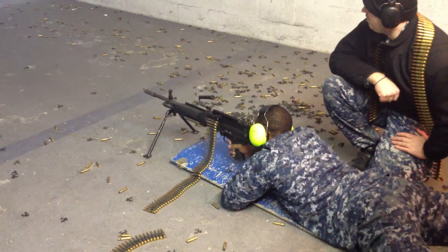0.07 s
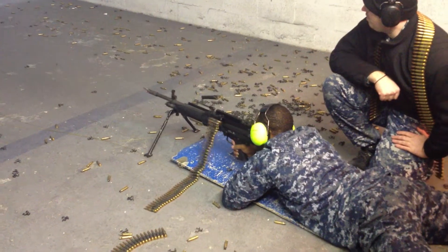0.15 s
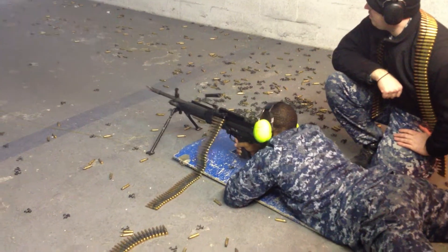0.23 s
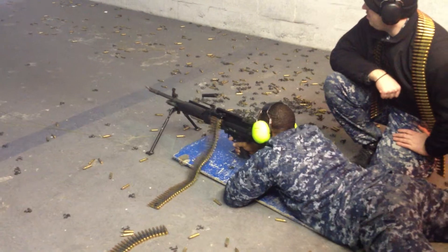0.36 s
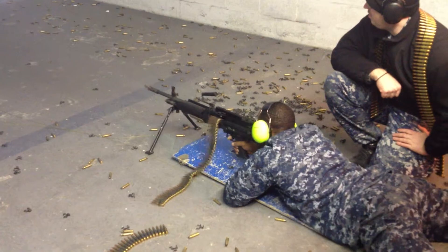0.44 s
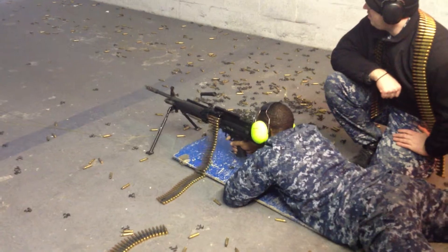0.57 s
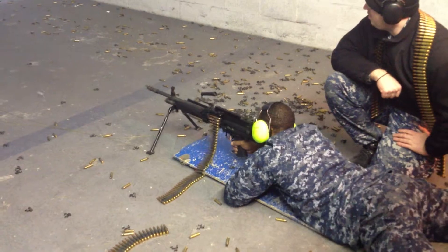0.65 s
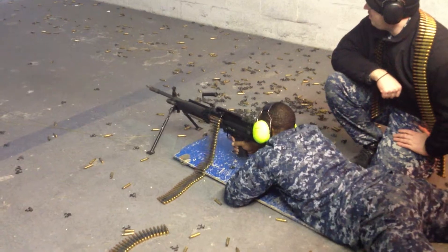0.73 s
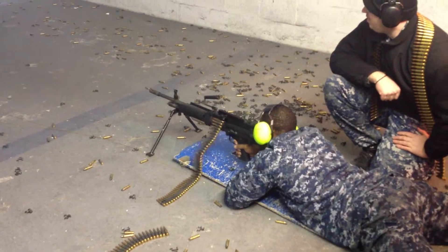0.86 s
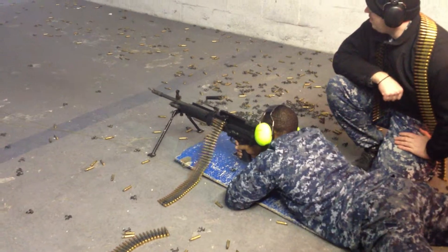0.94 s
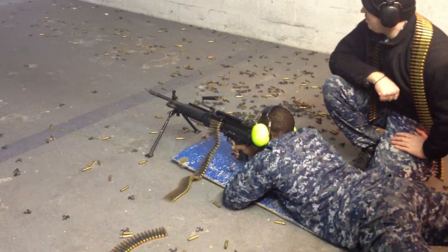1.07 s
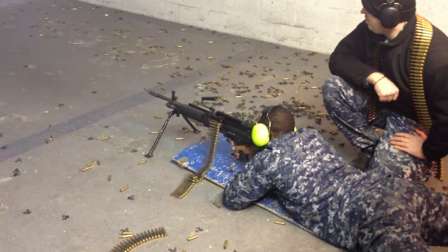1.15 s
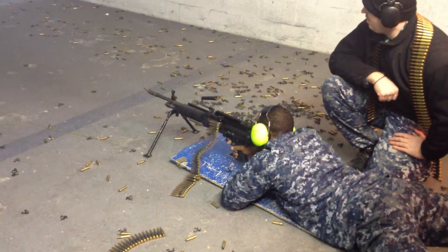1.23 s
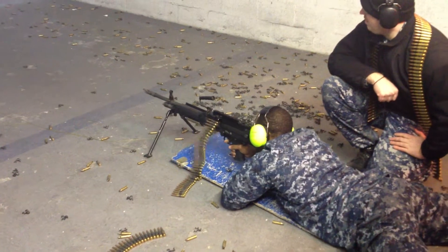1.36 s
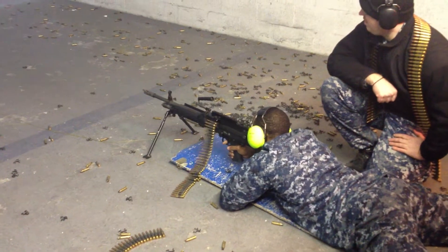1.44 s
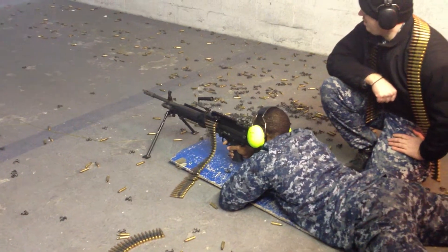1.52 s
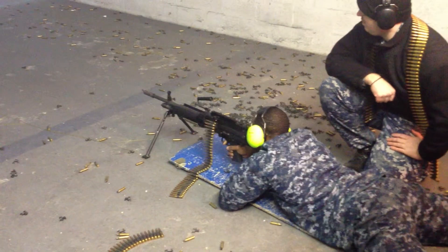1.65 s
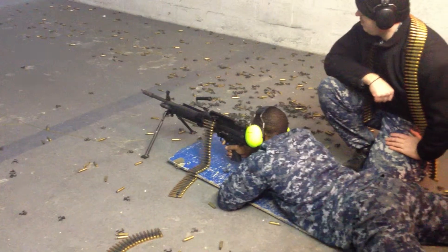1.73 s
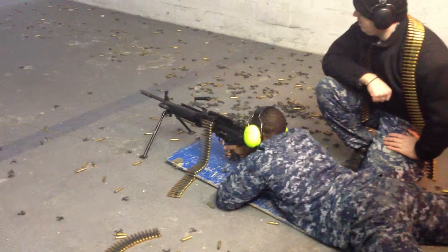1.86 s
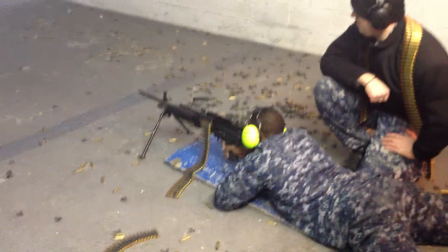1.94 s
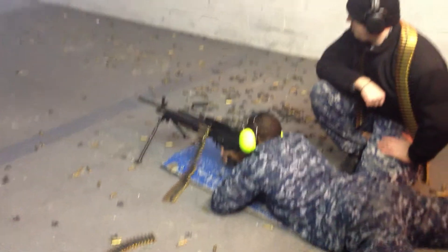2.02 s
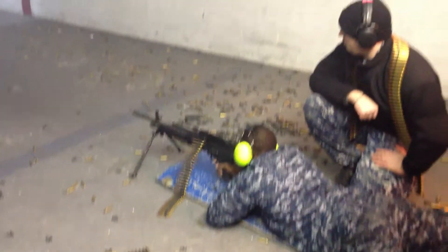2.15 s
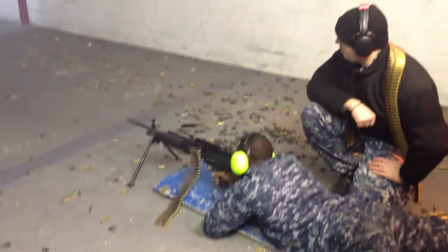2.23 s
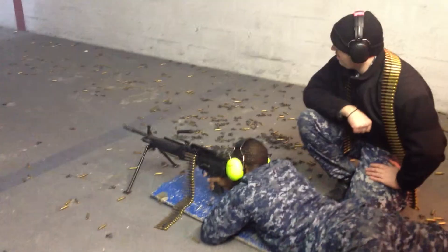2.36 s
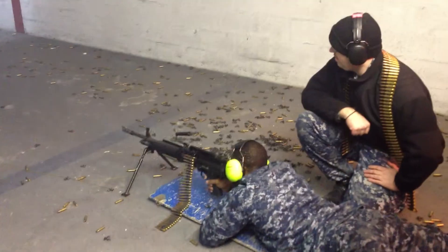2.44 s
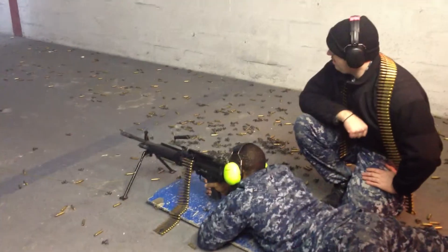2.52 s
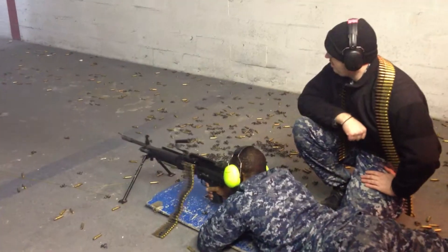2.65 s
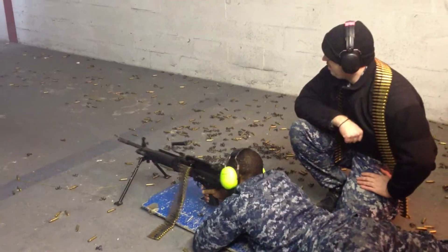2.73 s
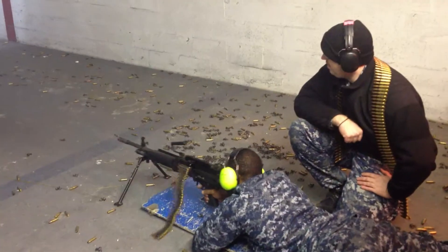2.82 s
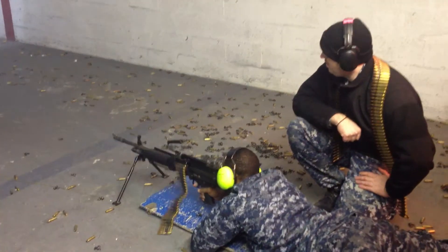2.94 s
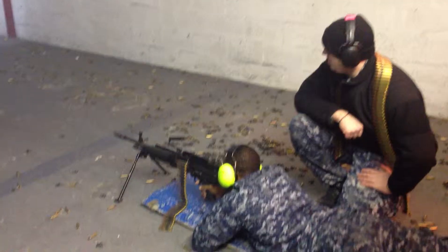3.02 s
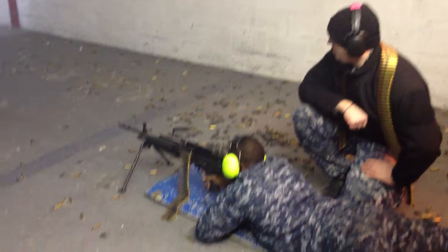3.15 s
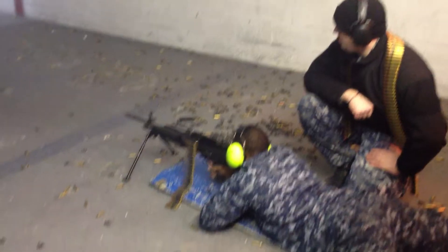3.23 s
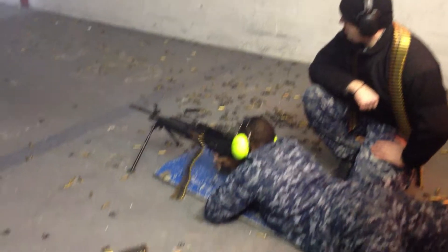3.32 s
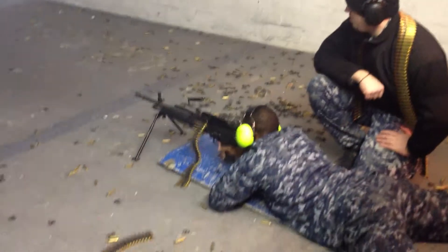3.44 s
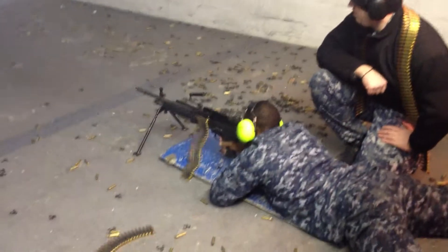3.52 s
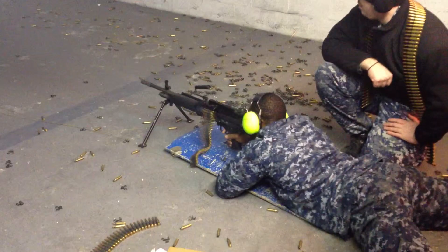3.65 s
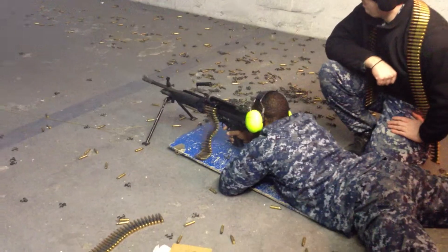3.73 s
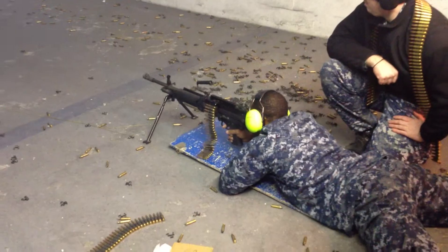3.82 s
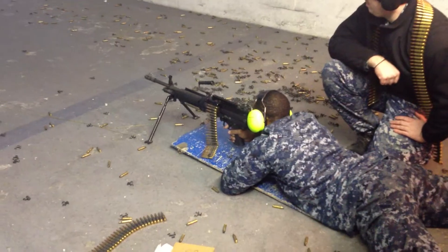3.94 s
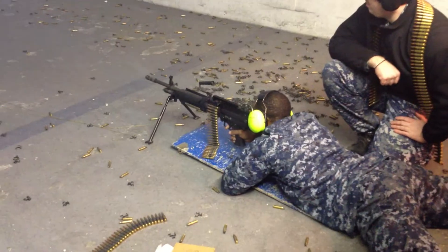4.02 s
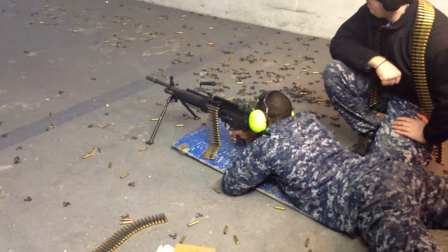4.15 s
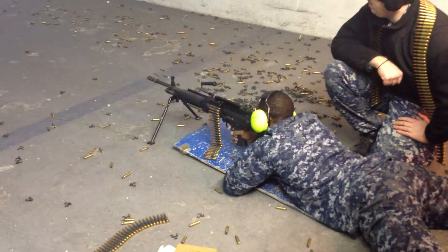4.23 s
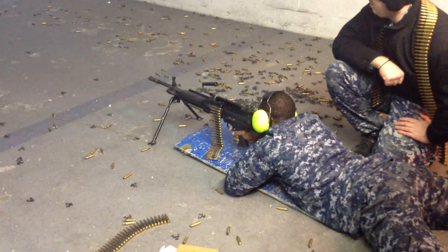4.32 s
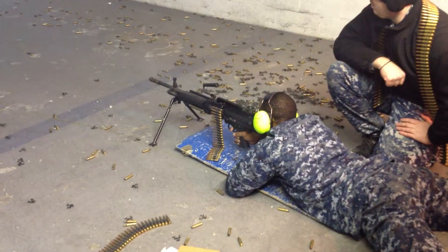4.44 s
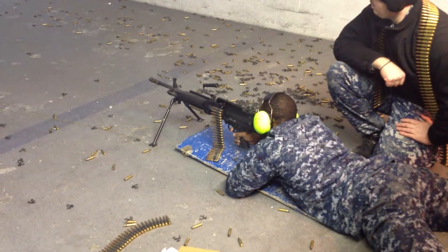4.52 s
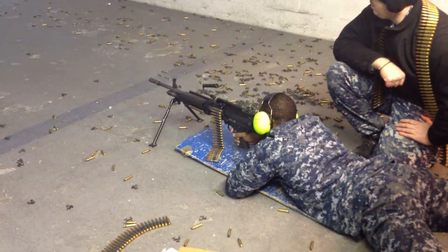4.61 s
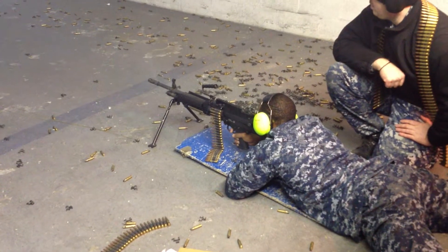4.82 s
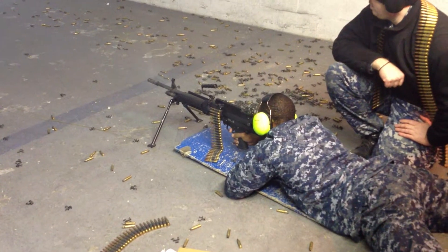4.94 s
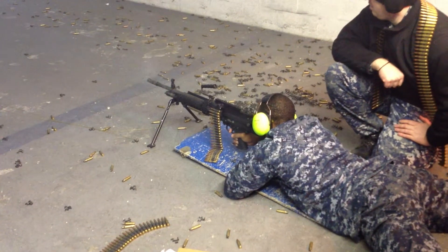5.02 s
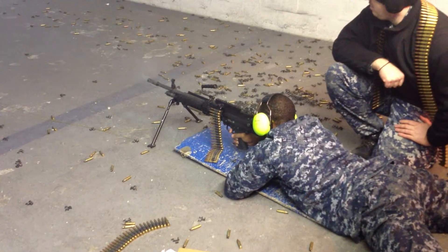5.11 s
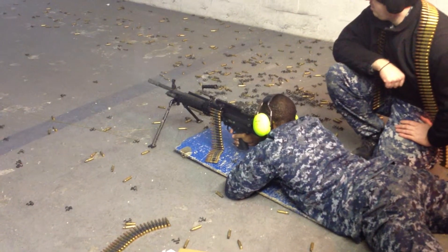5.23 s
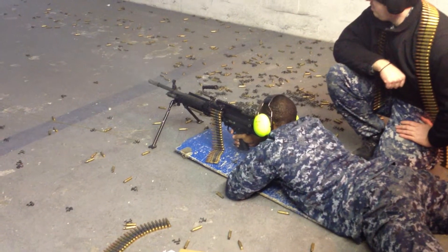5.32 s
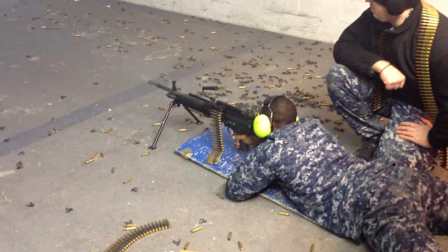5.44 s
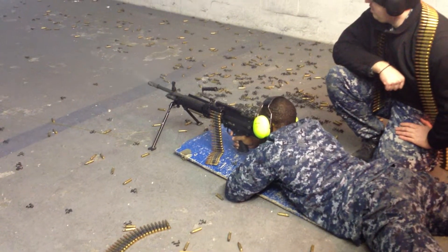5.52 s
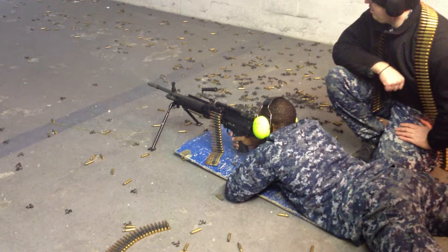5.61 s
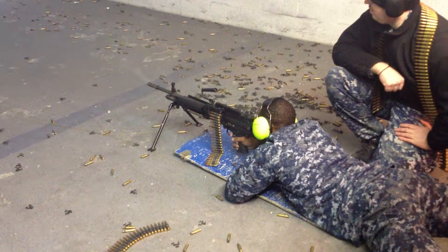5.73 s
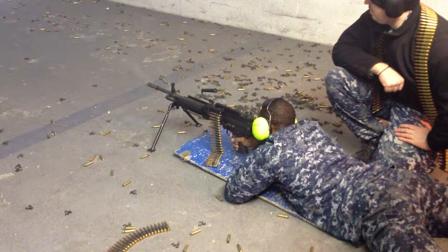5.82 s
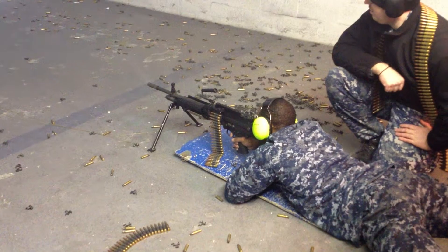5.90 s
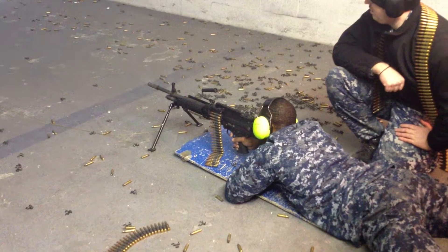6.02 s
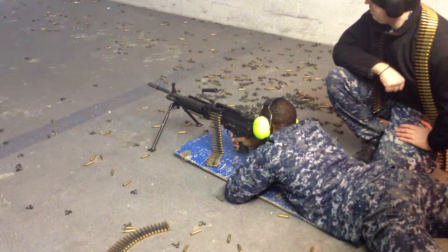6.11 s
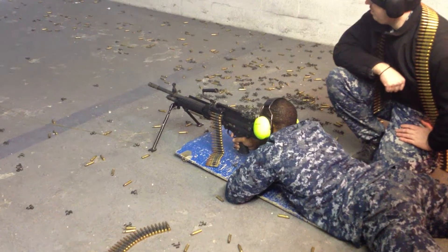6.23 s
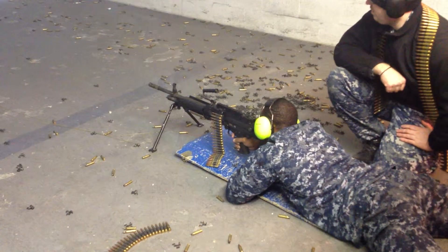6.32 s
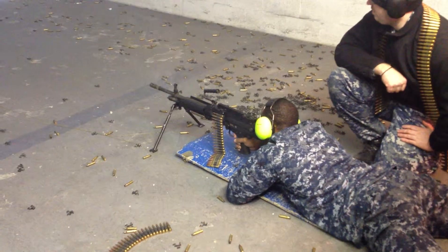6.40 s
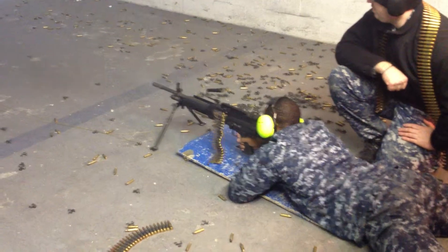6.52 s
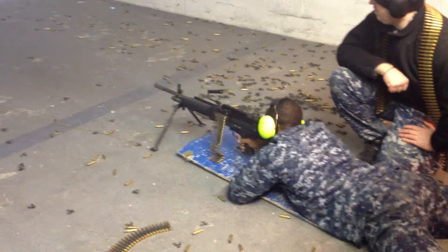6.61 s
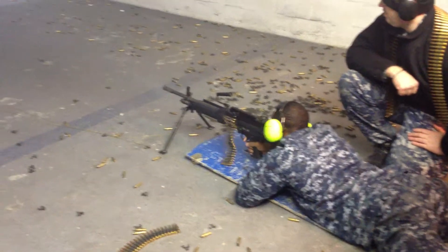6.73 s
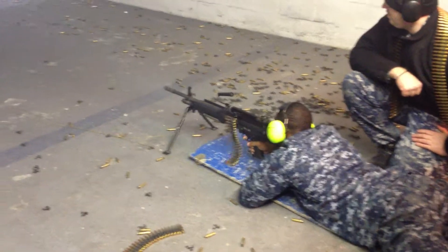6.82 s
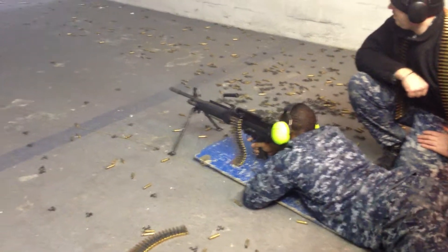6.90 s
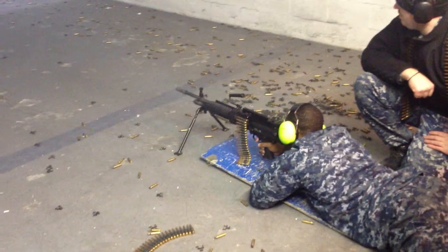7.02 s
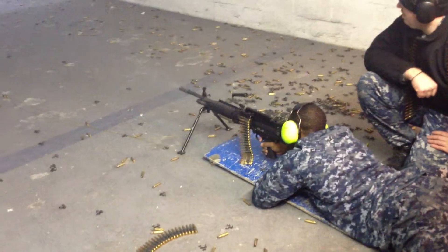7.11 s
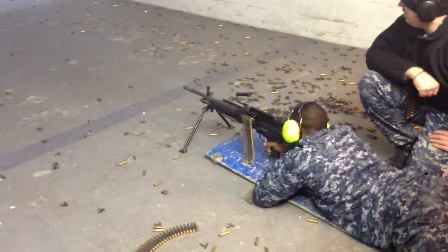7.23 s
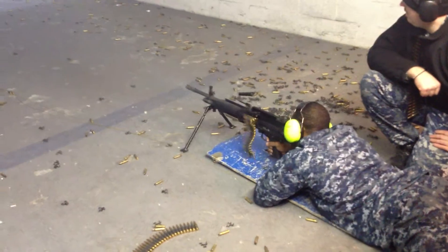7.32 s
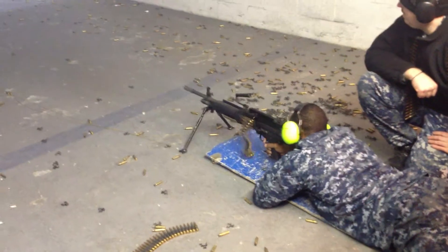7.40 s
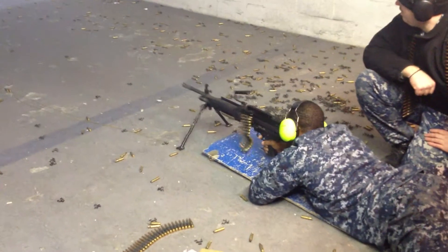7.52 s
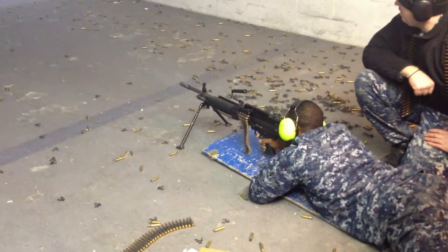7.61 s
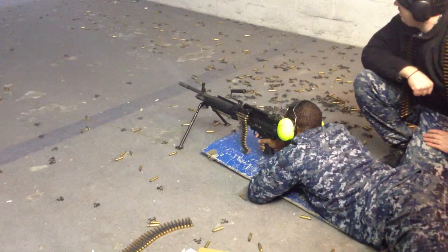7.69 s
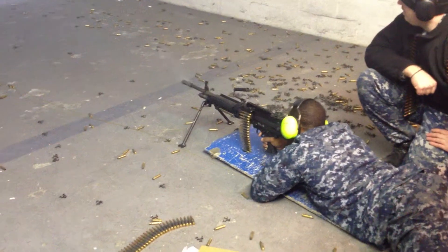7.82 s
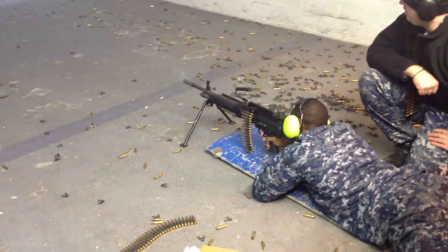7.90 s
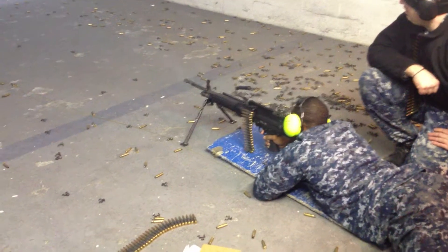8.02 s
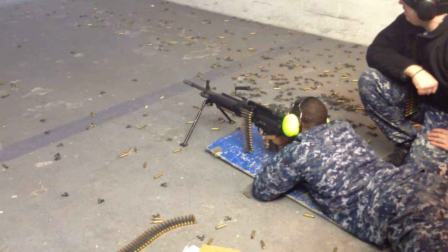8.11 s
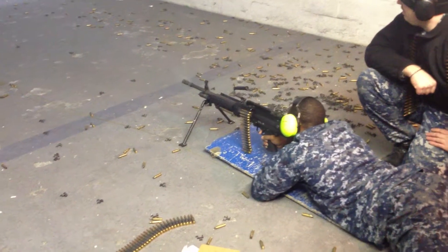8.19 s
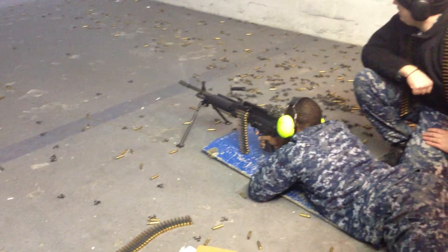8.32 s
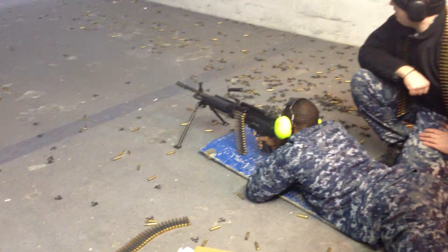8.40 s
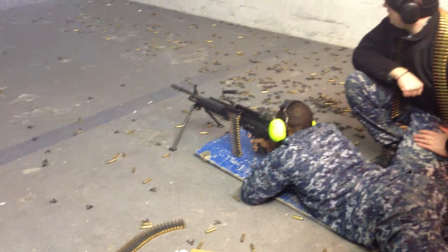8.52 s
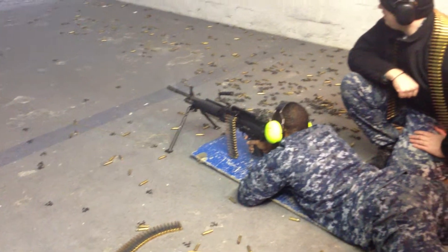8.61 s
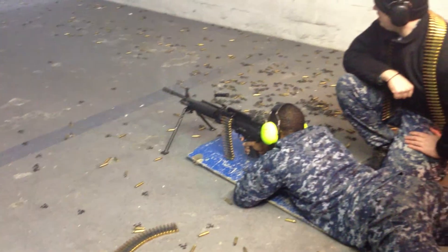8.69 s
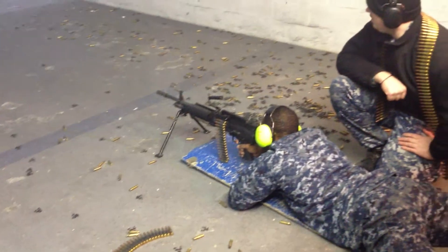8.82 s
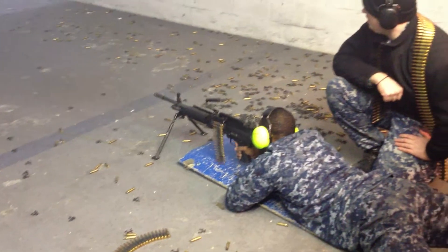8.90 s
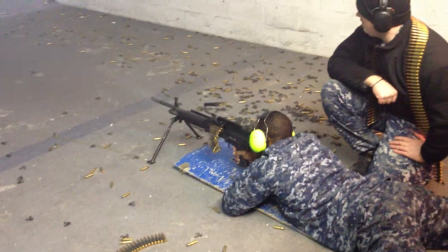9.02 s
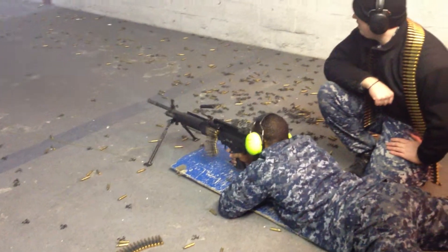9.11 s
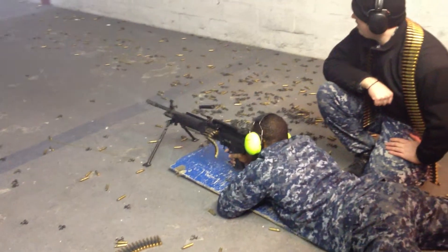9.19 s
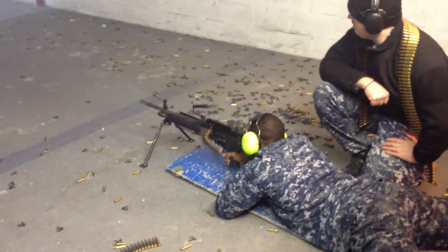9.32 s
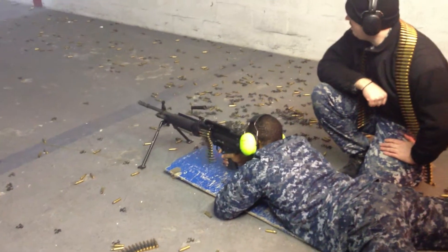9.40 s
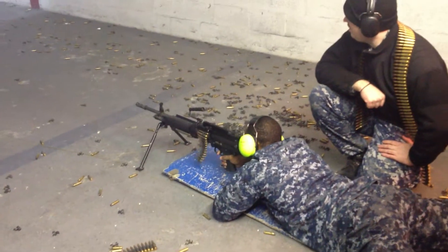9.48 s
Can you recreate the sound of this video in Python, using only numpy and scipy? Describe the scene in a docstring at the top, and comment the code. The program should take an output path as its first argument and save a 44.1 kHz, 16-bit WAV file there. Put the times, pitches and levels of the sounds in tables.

```python
"""A first burst is already ringing in a long concrete indoor range as a belt-fed machine gun fires on.
Short bursts at 12 rounds a second follow, each a run of noise reports in the roar of the hall; bolt clacks lead in.
In the pause from 4 to 6.5 s spent links tinkle as steel modes, the belt rustles as dull noise, ventilation hums.
Then three more bursts. A small camera is overwhelmed: its gain control ducks, its limiter pins every peak."""
import sys
import numpy as np
from scipy import signal
from scipy.fft import rfft, irfft, next_fast_len
from scipy.io import wavfile
from scipy.ndimage import uniform_filter1d, minimum_filter1d, map_coordinates

SR = 44100
rng = np.random.default_rng(int(sys.argv[2]) if len(sys.argv) > 2 else 0)


def unload_audio(sound):
    """Save the sound as a 16-bit wav file, at the path given as the first command line argument."""
    columns = np.transpose(np.atleast_2d(sound))
    # keep every value between -1 and 1, then stretch to whole-number steps
    steps = np.round(np.clip(columns, -1, 1) * 32767)
    wavfile.write(sys.argv[1], SR, steps.astype(np.int16))


N = 421155

# Ventilation rumble: (frequency [Hz], relative density [dB per Hz])
VENT_SPECTRUM = [(30, -20), (70, -2), (180, 18), (550, -3), (1000, 6.5), (2000, -4.5), (4600, -20.5),
                 (6200, -47), (7600, -63), (9000, -53), (15000, -61)]
# Thin hiss above the rumble: (frequency [Hz], relative density [dB per Hz])
HISS_SPECTRUM = [(3000, -12), (5500, -1), (6600, -1.5), (7500, 3), (8000, -3), (8800, -27), (15000, -50)]
# The belt slides on the mat: (time [s], level [dB])
BELT_SCRAPES = [(5.256, -39.5), (5.526, -36), (5.819, -41)]
# Spent links and cases land: (time [s], level [dB])
LINK_LANDINGS = [(5.01, -41.5), (5.251, -47), (5.471, -60), (5.635, -59), (6.405, -61), (8.56, -47)]
# Ringing modes of the small steel pieces: (frequency [Hz], level [dB], t60 [s])
STEEL_MODES = [(5720, -20, 1.0), (9530, -28.5, 4.7), (12580, -22, 1.2), (14620, -7, 0.41),
               (14790, -1, 0.55)]
# One bolt stroke runs forward, strips a cartridge, locks: (lead before first round [s], level [dB], t60 [s])
BOLT_STROKE = [(0.056, -33, .4), (0.038, -24, 0.61), (.007, -14, .25)]
# Steel contacts and belt scrapes: (frequency [Hz], relative density [dB per Hz])
CLACK_SPECTRUM = [(200, -38), (600, -8), (1700, 1), (4000, -0.5), (7000, -12.5), (9700, -24),
                  (15000, -15.5)]
# Pulls of the trigger, the first before the start: (time [s], blast level [dB], rounds [count])
BURSTS = [(-.43, 22, 4), (.172, 22, 4), (.806, 17.5, 7), (2.045, 13.5, 3), (2.62, 17, 4), (3.282, 14, 6),
          (6.51, 22.5, 3), (7.278, 14, 4), (8.964, 24, 4)]
# Muzzle blast: (frequency [Hz], relative density [dB per Hz])
BLAST_SPECTRUM = [(30, -33), (70, -34), (110, -21), (170, -6.5), (260, -0.5), (340, -2.5), (430, 0),
                  (600, 1), (800, -1), (1100, -2.5), (2400, -5.5), (4600, -10), (7500, -24.5),
                  (10000, -32.5), (15000, -26)]
# Decay of the hall: (frequency [Hz], t60 [s])
HALL_DECAY = [(60, 6.3), (170, 3.49), (250, 3.1), (340, 3.72), (430, 3.1), (620, 3.27), (900, 2.9),
              (1300, 2.48), (2200, 1.835), (3500, 1.555), (6000, 1.21), (15000, 1.14)]
# Resonances of the hall: (frequency [Hz], width [Hz], boost [dB])
HALL_RESONANCES = [(199, 62, 3), (332, 36, 4.5), (445, 25, 3), (553, 68, 2.5), (656, 29, 3), (745, 40, 3)]
# Tone of the camera: (frequency [Hz], gain [dB])
CAMERA_TONE = [(30, -7), (1000, -0.5), (4500, -0.5), (7000, 2.5), (10000, 1.5), (13000, 3.5), (15300, 1)]

CAMERA_TOP_HZ = 15500
ROUND_INTERVAL_S = .083
SCRAPE_T60_S = 1.4  # every scrape dies away alike


def amp(db):
    """Decibels to gain."""
    return 10 ** (np.asarray(db) / 20)


def unit(x):
    """Bring x to rms 1."""
    return x / np.sqrt(np.mean(x ** 2) + 1e-20)


def along(points, hz):
    """Read (frequency, value) points on a log frequency axis."""
    freqs, values = np.transpose(points)
    return np.interp(np.log(hz + 1), np.log(freqs), values)


def filtered(x, response):
    """Shape x by a response given as a function of frequency in Hz."""
    size = next_fast_len(len(x) + 8192)  # padding gives the filter room to ring out
    hz = np.fft.rfftfreq(size, 1 / SR)
    return irfft(rfft(x, size) * response(hz), size)[:len(x)]


def noise(spectrum, size):
    """Coloured noise of rms 1."""
    white = rng.standard_normal(size)
    return unit(filtered(white, lambda hz: amp(along(spectrum, hz))))


def wobble(rate, size):
    """A smooth random curve through `rate` random knots a second."""
    knots = rng.standard_normal(int(size * rate / SR) + 4)
    return map_coordinates(knots, [np.arange(size) * rate / SR])


def add(track, s, sound):
    """Mix a sound into the track at time s, trimming what falls outside."""
    start = round(s * SR)
    part = sound[max(-start, 0):max(len(track) - start, 0)]
    track[max(start, 0):][:len(part)] += part


def ventilation(air_db=-33, hiss_db=-66):
    """Ducts rumble as steady coloured noise; a thin hiss flutters above them."""
    flutter_db = 1.5 * wobble(22, N)
    rumble = amp(air_db) * noise(VENT_SPECTRUM, N)
    return rumble + amp(hiss_db + flutter_db) * noise(HISS_SPECTRUM, N)


def belt(soft_hz=5200, rise_s=0.013):
    """The belt slides on the mat: softly starting, decaying noise with its treble dulled."""
    out, t = np.zeros(N), np.arange(SR) / SR
    for s, db in BELT_SCRAPES:
        decay = amp(db - 60 * t / SCRAPE_T60_S)
        rise = 1 - np.exp(-t / rise_s)
        add(out, s, decay * rise * noise(CLACK_SPECTRUM, SR))
    return filtered(out, lambda hz: 1 / (1 + (hz / soft_hz) ** 6))


def tinkles(spread=.003, flicker_rate=160, flicker_db=-1, attack_s=.003):
    """Each small piece rings at slightly its own pitch; tumbling and echoes make the ring flicker."""
    out, t = np.zeros(N), np.arange(SR) / SR
    for s, db in LINK_LANDINGS:
        for hz, level, t60 in STEEL_MODES:
            phase = 2 * np.pi * hz * (1 + spread * rng.standard_normal()) * t
            # a complex flicker varies both strength and phase
            drift = wobble(flicker_rate, SR) + 1j * wobble(flicker_rate, SR)
            flicker = .5 + amp(flicker_db) * drift
            envelope = amp(db + level - 60 * t / t60) * (1 - np.exp(-t / attack_s))
            add(out, s, envelope * np.real(flicker * np.exp(1j * phase)))
    return out


def bolt_contacts():
    """Each trigger pull releases the same stroke before its first round: (time [s], level [dB], t60 [s])."""
    return [(s - lead, db, t60) for s, _, _ in BURSTS for lead, db, t60 in BOLT_STROKE]


def rattle(contacts, tick_db, tick_t60):
    """Steel parts meet with a short tick and rattle on in the hall, both cut from one noise."""
    out, t = np.zeros(N), np.arange(SR) / SR
    for s, db, t60 in contacts:
        tail = amp(-60 * t / t60)
        tick = amp(tick_db - 60 * t / tick_t60)
        add(out, s, amp(db) * noise(CLACK_SPECTRUM, SR) * (tail + tick))
    return out


def report(patchy_db=3.0, swell_db=1.13):
    """The hall answers one muzzle blast: clumps of echoes merge into a roar whose treble dies first."""
    size = 4 * SR
    hz, t, bins = signal.stft(noise(BLAST_SPECTRUM, size), SR, nperseg=512)
    # smooth random levels over frequency, then time, to form the clumps
    grain = rng.standard_normal(bins.shape)
    clumps = unit(uniform_filter1d(uniform_filter1d(grain, 12, axis=0), 7, axis=1))
    level_db = patchy_db * clumps - 60 * t / along(HALL_DECAY, hz)[:, None]
    roar = signal.istft(bins * amp(level_db), SR, nperseg=512)[1][:size]
    return roar * amp(swell_db * wobble(60, size))


def resonance(f, hz, width):
    """Response at f of one resonance of the hall, reaching 1 at its centre."""
    return 1j * f * width / (hz * hz - f * f + 1j * f * width)


def hall_boom(f):
    """Response of the hall: every resonance lifts its own band."""
    return 1 + sum((amp(db) - 1) * resonance(f, hz, width) for hz, width, db in HALL_RESONANCES)


def gun(jitter_s=.0004, scatter_db=1.5, stray_db=-6):
    """Rounds of a burst meet the same walls, so the roar repeats; stirred air changes part of it."""
    out = np.zeros(N)
    strays = [report() for _ in range(7)]  # the changing part, one for each place in a burst
    for s, db, rounds in BURSTS:
        shared = report()
        chance = rng.standard_normal((len(strays), 2))
        for k in range(min(round(rounds), len(strays))):
            late, louder = chance[k]
            shot_s = s + k * ROUND_INTERVAL_S + jitter_s * late * (k > 0)  # first round is on time
            shot = shared + amp(stray_db) * strays[k]
            add(out, shot_s, amp(db + scatter_db * louder) * shot)
    return filtered(out, hall_boom)


def scene():
    """Ventilation, loose metal and gun meet at the camera."""
    loose_metal = belt() + tinkles() + rattle(bolt_contacts(), tick_db=-9, tick_t60=.012)
    return (ventilation() + loose_metal + gun())[None]


def recovering(gain_db, speed_db):
    """A gain that drops at once but climbs back by only speed_db a second."""
    ramp = speed_db * np.arange(N) / SR
    return np.minimum.accumulate(gain_db - ramp) + ramp


def gain_control(x, target_db, window_s, depth_db, hold_s, release_db):
    """Loud sound ducks the gain by at most depth_db; it waits a moment, then creeps back."""
    power = np.abs(uniform_filter1d(x ** 2, max(round(window_s * SR), 2)))
    needed_db = np.clip(target_db - 10 * np.log10(power + 1e-12), min(depth_db, 0), 0)
    half = round(hold_s * SR / 2)
    held_db = minimum_filter1d(needed_db, 2 * half + 1, origin=half)  # looks back over the hold
    return x * amp(recovering(held_db, release_db))


def limiter(x, top, knee, speed_db):
    """Each peak is pinned to the top; the gain recovers within a few cycles, so the roar crackles."""
    needed_db = -20 * np.log10(1 + np.abs(x / top) ** knee) / knee
    return x * amp(recovering(needed_db, speed_db))


def record(dry):
    """Bass cut, gain control, an overworked peak limiter, then the camera's tone and band limit."""
    bass_cut = signal.butter(4, 115, 'highpass', fs=SR, output='sos')
    x = signal.sosfilt(bass_cut, dry[0])
    # release and recovery speeds in dB a second
    x = gain_control(x, target_db=-2.5, window_s=.0086, depth_db=-7.0, hold_s=0.25, release_db=14.5)
    x = limiter(x, top=0.8, knee=15.0, speed_db=7004.5)
    return filtered(x, lambda hz: amp(along(CAMERA_TONE, hz)) * (hz < CAMERA_TOP_HZ))[None]


dry = scene()
out = record(dry)
unload_audio(out)
```